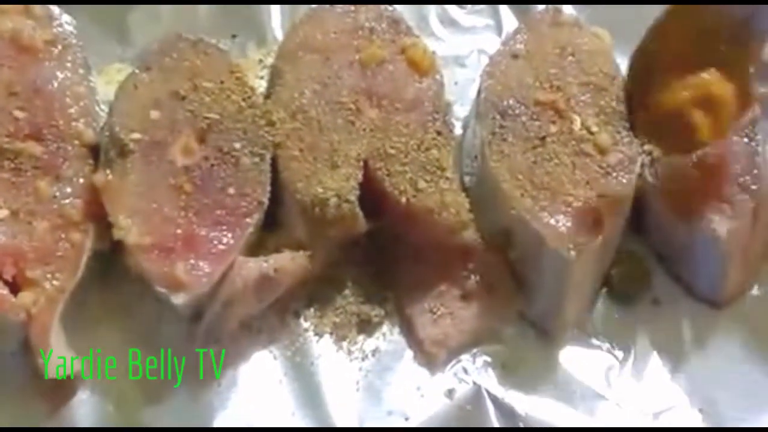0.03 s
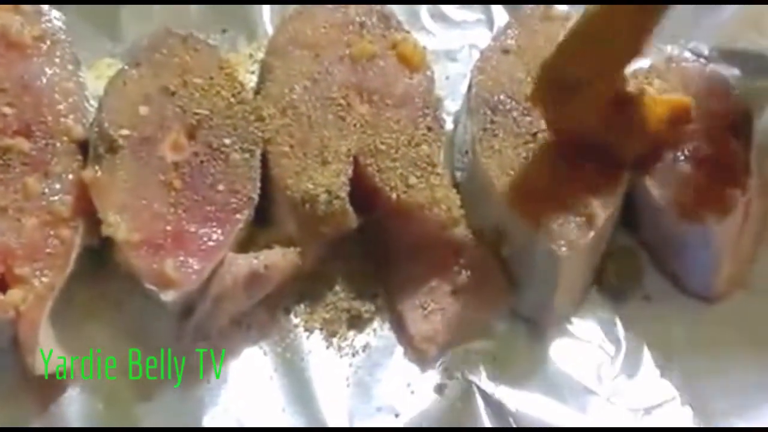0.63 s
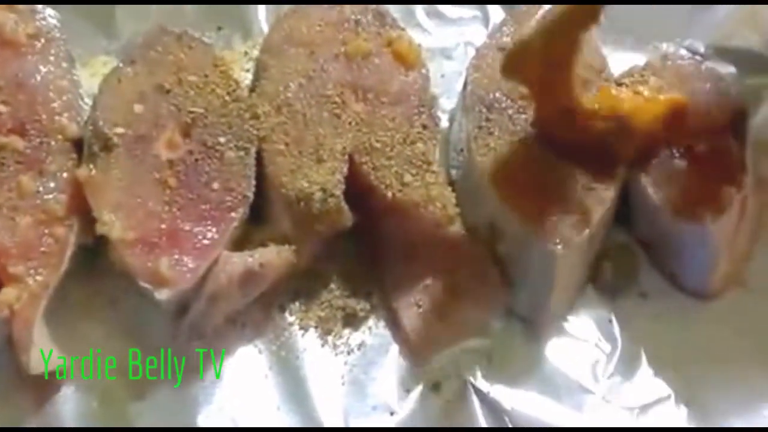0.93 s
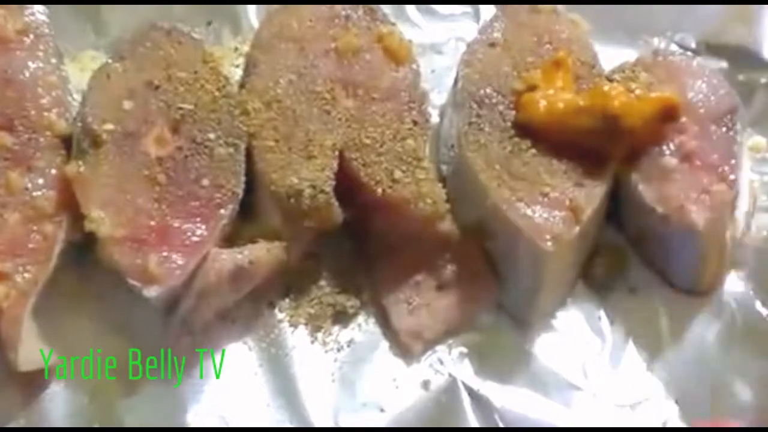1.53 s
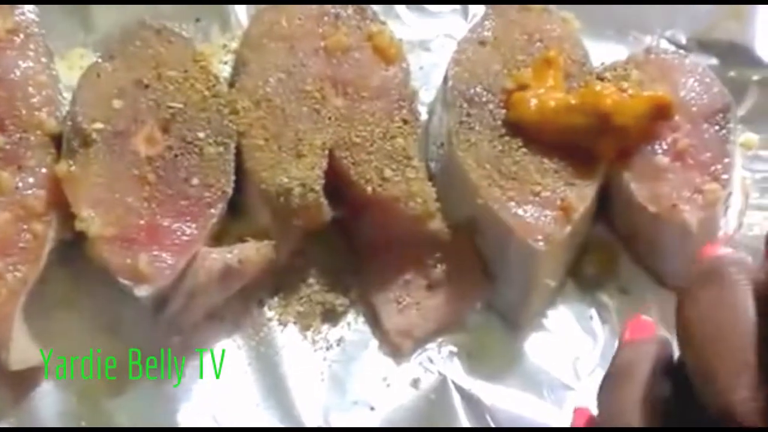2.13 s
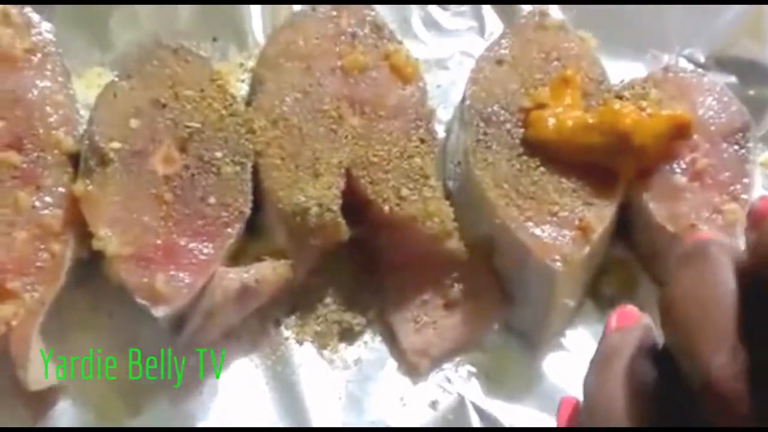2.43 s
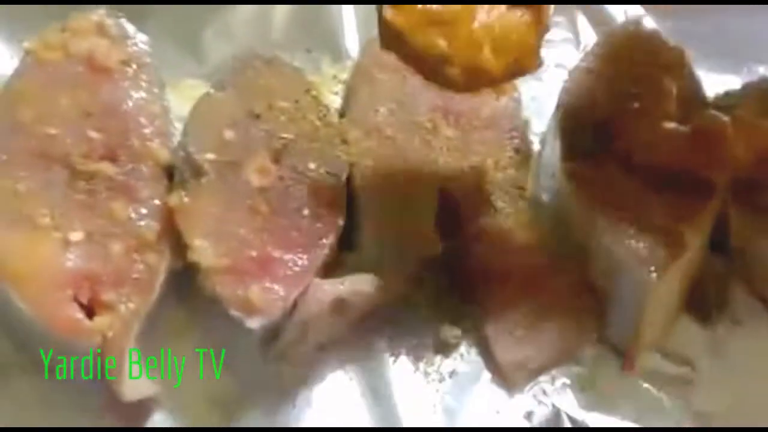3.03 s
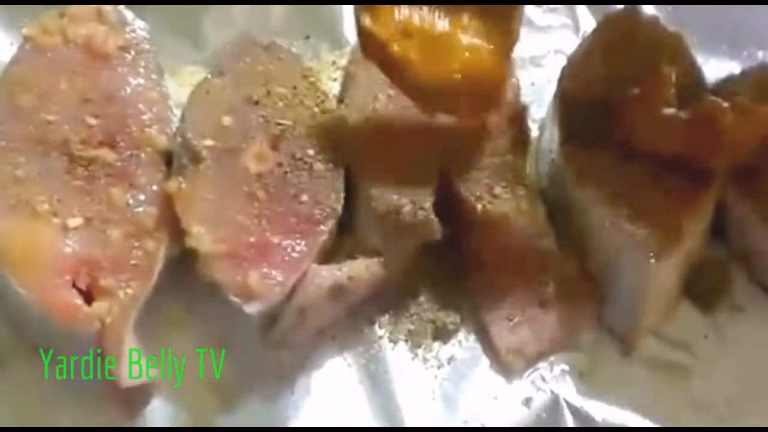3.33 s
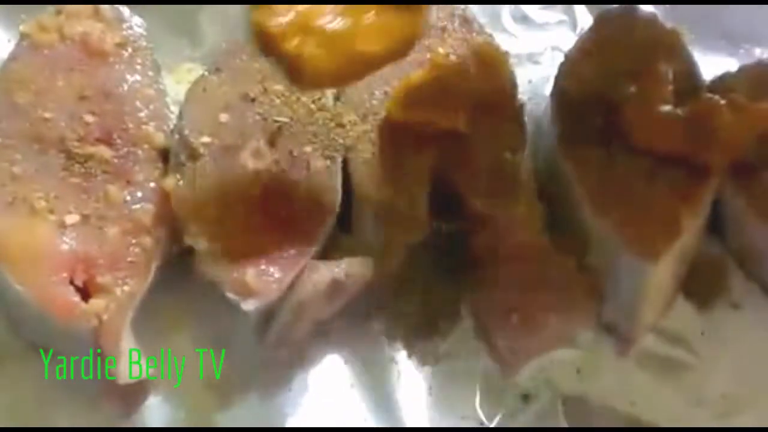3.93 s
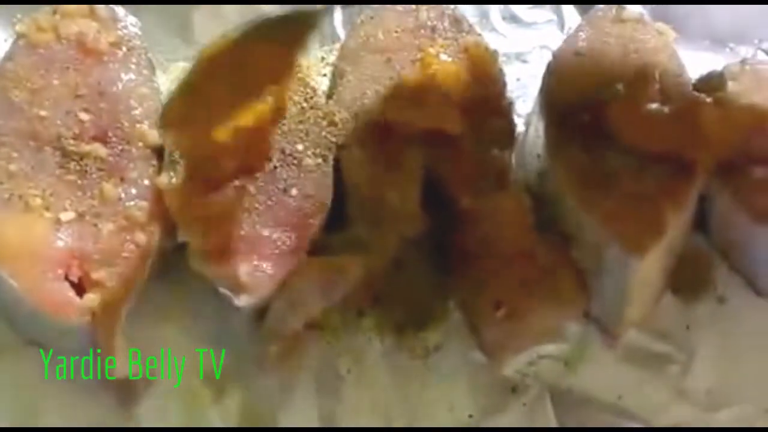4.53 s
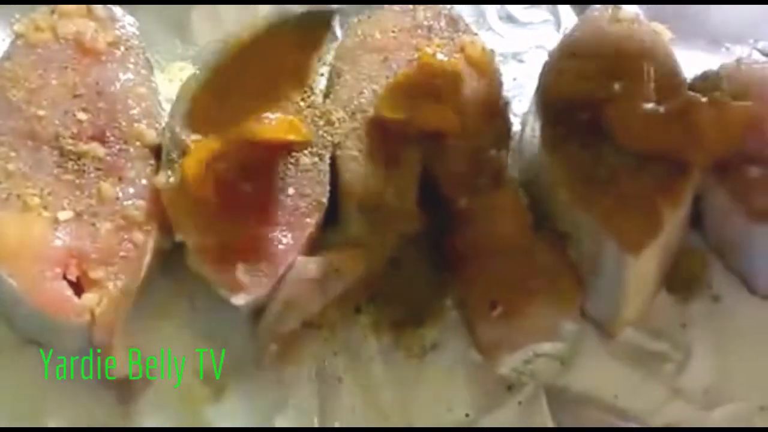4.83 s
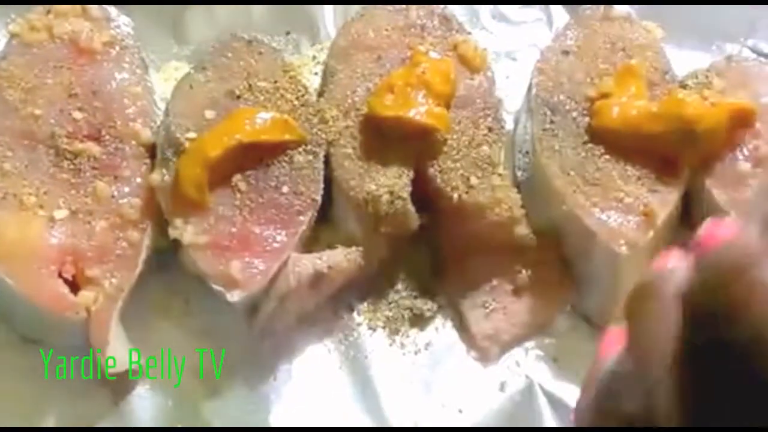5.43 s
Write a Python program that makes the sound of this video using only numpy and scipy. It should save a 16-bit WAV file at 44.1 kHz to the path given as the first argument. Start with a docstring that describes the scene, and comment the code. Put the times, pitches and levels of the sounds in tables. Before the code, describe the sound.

A metal spoon scoops thick sauce from a glass jar twice, close to the microphone and a little to the right. Each scoop follows a short foil rustle and makes an uneven cluster of bright, quickly choked clinks and duller knocks. Between them lies a lull of nearly three seconds with tiny wet ticks and a barely audible whistle. A soft appliance hum and rumble fill the small kitchen throughout.

```python
"""A metal spoon in a glass jar of thick sauce, close to a stereo microphone in a small kitchen.
Room rumble, appliance hum and tiny wet ticks of sauce run throughout. Foil rustles at 1.4 s; from 1.7
to 2.4 s the spoon scoops, each knock ringing the damped glass and the air in the jar. A faint whistle
comes and goes in the pause. Foil rustles again at 4.9 s, and a second scoop knocks from 5.2 s on."""
import sys
import numpy as np
from scipy import signal
from scipy.fft import rfft, irfft
from scipy.io import wavfile

SR = 44100
rng = np.random.default_rng(int(sys.argv[2]) if len(sys.argv) > 2 else 0)


def wrap_up_sound(samples):
    """Save the sound to the file named by the first command line argument, as 16-bit audio."""
    columns = np.atleast_2d(samples).T
    # keep every value between -1 and 1, then stretch to whole-number steps
    tamed = np.clip(columns, -1, 1)
    steps = np.round(tamed * 32767).astype(np.int16)
    wavfile.write(sys.argv[1], SR, steps)


N = 251370
TIME_S = np.arange(N) / SR
AGE_S = TIME_S[:SR // 2]  # time axis of one event


def amp(db):
    """Decibels to gain."""
    return 10 ** (np.asarray(db) / 20)


def unit_rms(x):
    """Scales to rms 1."""
    return x / np.sqrt(np.mean(x ** 2) + 1e-20)


def at_hz(points, hz):
    """Interpolates (Hz, value) rows on a log-frequency axis."""
    f, value = np.transpose(points)
    return np.interp(np.log(hz + 1), np.log(f + 1), value)


def add(mix, start_s, sound):
    """Mixes a stereo sound in."""
    part = mix[:, max(round(start_s * SR), 0):][:, :sound.shape[1]]
    part += sound[:, :part.shape[1]]


def bins_hz(x):
    """Frequencies of the spectrum of x."""
    return np.fft.rfftfreq(x.shape[-1], 1 / SR)


def colour(x, points):
    """Filters by (Hz, dB) rows."""
    return irfft(rfft(x) * amp(at_hz(points, bins_hz(x))), x.shape[-1])


def click(gain_db):
    """Minimum-phase impulse with this spectrum."""
    log_gain = np.log(amp(np.r_[gain_db, gain_db[-2:0:-1]]))
    return np.fft.ifft(np.exp(np.conj(signal.hilbert(log_gain)))).real


def drift(cutoff_hz):
    """Low-passed noise of rms 1."""
    return unit_rms(irfft(rfft(rng.standard_normal(N)) / (1 + (bins_hz(TIME_S) / cutoff_hz) ** 4), N))


def mode(hz, t60_s, build_s=0.001, lag_s=0, choke_s=0.15):
    """One vibration: builds during contact, decays, and is choked as the spoon settles back."""
    swell = (1 - np.exp(-(AGE_S / build_s) ** 2)) * np.exp(-(AGE_S / choke_s) ** 4)
    return swell * np.sin(2 * np.pi * hz * (AGE_S - lag_s)) * amp(-60 * AGE_S / max(t60_s, 0.003))


def kitchen(x, wet_db, correlation, gap_s=0.0046, bend=1):
    """Direct sound plus dense stereo reflections; bend > 1 holds them up briefly before they fall."""
    # Each row: frequency in Hz, room t60 in seconds.
    reverb_times = [(100, 0.63), (900, 0.27), (2600, .21), (5000, .2), (10000, 0.19)]
    common, own = rng.standard_normal((2, len(AGE_S)))
    left = correlation * common + np.sqrt(1 - correlation ** 2) * own
    hz, t, spectra = signal.stft([left, common], SR, nperseg=256)
    fall = amp(-60 * (t / at_hz(reverb_times, hz)[:, None]) ** bend)
    onset = 1 - np.exp(-(AGE_S / gap_s) ** 4)
    tail = signal.istft(spectra * fall, SR)[1][:, :len(AGE_S)] * onset
    wet = signal.fftconvolve(x[None], tail, axes=1)[:, :len(AGE_S)]
    wet -= np.outer(wet @ x / (x @ x), x)  # orthogonal to x, so powers add
    return x + amp(wet_db) * x.std() * np.array([unit_rms(side) for side in wet])


def room_tone(rumble_db=-57.5):
    """Rumble and hiss, a soft rush that grows, and an appliance's wavering hum."""
    # Each row: frequency in Hz, relative level in dB.
    rumble_spectrum = [(15, -53.5), (25, -29), (40, -11.5), (69, -4.5), (129, -2.5), (158, -8), (193, -6),
                       (261, -12.5), (372, -17), (699, -27), (970, -26.5), (1780, -32.5), (3510, -33),
                       (4300, -39), (10400, -35), (13500, -69.5), (22000, -120)]
    rush_spectrum = [(200, -18.5), (500, 0.5), (800, 2.5), (1050, 1.5), (1400, -10.5), (3000, -16.5),
                     (6000, -28.5)]
    # Each row: time in seconds, level in dB.
    rush_levels = [(0, -101), (1.4, -76), (2.6, -69.5), (3.3, -71.5), (5.7, -63.5)]
    # Each row: frequency in Hz, left-right correlation.
    correlations = [(40, 0.99), (250, 0.91), (600, 0.73), (1500, 0.23), (4000, 0.095), (10000, 0.51)]
    # Each row: centre in Hz, width in Hz, level in dB.
    hum_bands = [(74, 14, -67.5), (198.4, 12.2, -63), (239.7, 15, -72)]
    hz = bins_hz(TIME_S)
    common, own, hum_noise = rfft(rng.standard_normal((3, N)))
    correlation = at_hz(correlations, hz)
    air = irfft(np.array([common, correlation * common + np.sqrt(1 - correlation ** 2) * own]), N)
    rumble = amp(rumble_db + 0.5 * drift(cutoff_hz=11)) * unit_rms(colour(air, rumble_spectrum))
    rush_db = np.interp(TIME_S, *np.transpose(rush_levels))
    rush = amp(rush_db) * unit_rms(colour(air[:, ::-1], rush_spectrum))
    hum = sum(amp(db) * unit_rms(irfft(hum_noise / (1 + (2 * (hz - centre_hz) / width_hz) ** 2), N))
              for centre_hz, width_hz, db in hum_bands)
    return rumble + rush + hum


def whistle(hz=3610, wander_hz=14):
    """A faint, slightly unsteady tone that comes and goes."""
    # Each row: start in seconds, length in seconds, peak level in dB.
    swells = [(3.115, 0.1, -78.5), (3.448, .14, -70), (3.58, 0.15, -80.5), (4.199, 0.058, -76)]
    level = sum(amp(db) * np.sin(np.pi * np.clip((TIME_S - start_s) / length_s, 0, 1))
                for start_s, length_s, db in swells)
    return level * np.sin(2 * np.pi * np.cumsum(hz + wander_hz * drift(cutoff_hz=74)) / SR)


def sauce_ticks(db=-66, ticks_per_s=9, decay_s=0.008):
    """Tiny wet ticks as sauce slides off the spoon."""
    starts = rng.random(N) * (rng.random(N) < ticks_per_s / SR)
    level = signal.lfilter([1], [1, -np.exp(-1 / (decay_s * SR))], starts)
    fizz = colour(rng.standard_normal((2, N)), [(1000, -12.5), (5000, -5.5), (8000, 7), (10500, -6)])
    return amp(db) * level * unit_rms(fizz)


def foil_rustle(db, rise_s=0.006, decay_s=0.0069, snaps_per_s=14000):
    """A swell of tiny snaps in kitchen foil."""
    # Each row: frequency in Hz, relative level in dB.
    snap_spectrum = [(30, -36.5), (120, -7), (500, -25.5), (1000, -18), (2000, -17), (3000, -5.5),
                     (3900, -2.5), (5600, -2), (7000, -9.5), (9000, -17.5), (10600, -20)]
    snaps = rng.standard_normal(len(AGE_S)) * (rng.random(len(AGE_S)) < snaps_per_s / SR)
    snap = click(at_hz(snap_spectrum, bins_hz(AGE_S)))
    crackle = unit_rms(signal.fftconvolve(snaps, snap)[:len(AGE_S)])
    swell = np.minimum(AGE_S / rise_s, 1) * np.exp(-np.maximum(AGE_S - rise_s, 0) / decay_s)
    return kitchen(amp(db) * crackle * swell, wet_db=1, correlation=0.4, bend=0.9)


def handling_thud(db, hz):
    """Handling excites one soft, low mode."""
    return kitchen(amp(db) * mode(hz, t60_s=0.17), wet_db=-0.5, correlation=1)


def jar_bump(db):
    """The whole jar gives a short, dull knock."""
    # Each row: frequency in Hz, relative level in dB, t60 in seconds.
    body_modes = [(334, -10, .041), (608, -1, 0.038), (1210, 4.5, 0.0085)]
    body = sum(amp(db + mode_db) * mode(hz, t60_s) for hz, mode_db, t60_s in body_modes)
    return kitchen(body, wet_db=-3.5, correlation=0.9)


def air_plop(db, hz):
    """The air above the sauce rings hollow, at a pitch set by the spoon's depth."""
    return kitchen(amp(db) * mode(hz, t60_s=0.069, build_s=0.0029), wet_db=-8.5, correlation=0.98)


def contact_db(hz, hardness_hz):
    """Low-pass gain of a blow: a soft contact leaves out the treble."""
    return -10 * np.log10(1 + (hz / hardness_hz) ** 8)


def spoon_clack(db, hz, hardness_hz, chatter_s=0.0035):
    """The spoon lands, chatters and rings briefly; its pitch depends on which part lands."""
    # Each row: frequency in Hz, relative level in dB.
    clack_spectrum = [(100, -26), (400, -22.5), (1000, -15), (1500, -21.5), (2200, -19.5), (2600, -8),
                      (3000, -9.5), (3450, 0.5), (4300, -1.5), (5000, 0.5), (6000, -4.5), (7400, -8.5),
                      (8200, -9.5), (10600, -16.5)]
    chatter = rng.standard_normal(len(AGE_S)) * np.exp(-AGE_S / chatter_s)
    snap = click(at_hz(clack_spectrum, bins_hz(AGE_S)) + contact_db(bins_hz(AGE_S), hardness_hz))
    clack = amp(db - 3) * signal.fftconvolve(chatter, snap)[:len(AGE_S)]
    return clack + amp(db - 4) * mode(hz, t60_s=0.015)


def spoon_knock(start_s, ring_db, clack_db, spoon_hz, hardness_hz, damping):
    """One blow rings spoon, glass and air; a spoon left pressed damps the glass and raises its modes."""
    # Each row: free frequency in Hz, relative level in dB, undamped t60 in seconds.
    glass_modes = [(2591.5, -8.5, 0.076), (2783, -29, 0.02), (3280, -18, 0.077), (3580, -18, 0.076),
                   (4200, -20.5, 0.05), (4545, -11.5, 0.06), (4826, -6, 0.047), (4890, -7, .14),
                   (4920, -4.5, 0.13), (5160, -7, 0.046), (5080, -15, .04), (5540, -11.5, 0.045),
                   (6230, -22, 0.037), (6846, -16, 0.035), (8060, -20, .02)]  # rim mode first; the pair near 4.9 kHz beats
    # Each row: time in seconds, stiffness of the leaning spoon's contact in Hz.
    lean = [(1.68, 960), (1.75, 100), (2.05, 101), (2.3, 1653), (2.37, 1395), (2.42, 294), (5.19, 198),
            (5.69, 690)]
    # Each row: time in seconds, base reflection level of an undamped blow in dB.
    room_levels = [(1.68, 4), (2.05, 5.5), (2.37, 8.5), (2.42, -4), (5.19, 3), (5.65, 7.5)]  # driest while the jar is held close
    stiffness_hz = np.interp(start_s, *np.transpose(lean))
    room_db = np.interp(start_s, *np.transpose(room_levels)) - 10 * np.log2(damping)  # damped is drier
    rim_db = min(-10 - 0.8647 * ring_db - 3.5 * np.log2(hardness_hz / 5900), 4)  # favours light, soft taps
    lag_s = rng.uniform(0.00038, 0.0016)  # the bending wave runs round the wall
    rim, *wall = [amp(ring_db + db + contact_db(hz, hardness_hz))
                  * mode(np.hypot(hz, stiffness_hz), t60_s / damping, lag_s=lag_s)
                  for hz, db, t60_s in glass_modes]
    clack = spoon_clack(clack_db, spoon_hz, hardness_hz)
    bend = 1 + 0.35 / damping
    return (kitchen(clack, wet_db=room_db + 4, correlation=0.6, bend=1.1)
            + kitchen(amp(rim_db) * rim, wet_db=room_db + 3, correlation=0.19, bend=bend)
            + kitchen(sum(wall), wet_db=room_db - 1.5, correlation=0.65, bend=bend)
            + air_plop(ring_db - 32, hz=972))


def scoops():
    """Two scoops, each led by foil; the right microphone port faces them."""
    # Each row: start in seconds, glass ring in dB, clack in dB, spoon pitch in Hz,
    # contact hardness in Hz, damping factor.
    knocks = [ (1.6855, -15, -6.5, 2960, 6934, 2.4), (1.748, -6, -6.5, 4944, 10700, 1.02),
              (2.0098, -6, -5, 6210, 7950, 1.72), (2.0500, -18, -18, 4000, 8700, 1.33),
              (2.1147, -8, -1, 3970, 6500, 2.76), (2.299, -47, -43.5, 3130, 4640, 1.2),
              (2.3180, -37, -28.5, 5250, 5640, 2.8), (2.3673, -26.5, -17.5, 3360, 6070, 2.36),
              (2.3905, -39, -43, 3290, 5060, 3), (2.4200, -17.5, -33, 2750, 4800, 1.5),
              (2.4322, -17, -42.5, 5230, 5330, 2.1), (2.4421, -10.5, -11.5, 4730, 5220, 2.14),
              (5.188, -14.5, -8.5, 4700, 12000, 1.65), (5.4892, -29, -17.5, 5080, 5600, 1.98),
              (5.5024, -28, -31.5, 3480, 5000, 2.4), (5.6207, -7.5, -3, 2750, 4950, 1.94),
              (5.6430, -19.5, -40, 2730, 4400, 1.17), (5.6647, -13, -8, 3440, 4760, 1.86),
              (5.675, -18.5, -21, 3580, 4450, 3.1), (5.6802, -12, -10, 3620, 4700, 2.2)]
    # Each row: start in seconds, level in dB, pitch in Hz.
    plops = [(1.6853, -24, 955), (1.702, -29, 1067), (2.0094, -28.5, 963), (2.045, -33, 925),
             (2.1146, -33, 891), (2.127, -22.5, 893), (2.4432, -37, 873), (5.1876, -27.5, 748)]
    thuds = [(1.545, -41, 192), (2.016, -48, 83.5), (2.37, -43.5, 134), (2.426, -42.5, 76),
             (5.189, -45, 196.6)]
    # Each row: start in seconds, level in dB.
    bumps = [(1.748, -52.5), (5.189, -25.5), (5.623, -39.5)]
    rustles = [(1.425, -38), (1.438, -35.5), (1.475, -28), (1.532, -31), (1.542, -22), (4.914, -50.5),
               (4.933, -32), (4.954, -22), (4.981, -39)]
    # Each row: frequency in Hz, gain of the left port against the right in dB.
    left_port = [(2000, 1), (2600, -6.5), (3300, -8), (4200, -11.5), (5000, -8), (6500, -9), (8000, 2),
                 (10500, -5)]
    mix = np.zeros((2, N))
    for start_s, *blow in knocks:
        add(mix, start_s, spoon_knock(start_s, *blow))
    for start_s, db, hz in plops:
        add(mix, start_s, air_plop(db, hz))
    for start_s, db in bumps:
        add(mix, start_s, jar_bump(db))
    for start_s, db, hz in thuds:
        add(mix, start_s, handling_thud(db, hz))
    for start_s, db in rustles:
        add(mix, start_s, foil_rustle(db))
    return np.array([colour(mix[0], left_port), mix[1]])


def scene():
    """All sources at the two microphone ports."""
    return scoops() + sauce_ticks() + whistle() + room_tone()


def record(dry):
    """Soft clipping, then a low-pass."""
    cutoff_hz = 10650
    lowpass = signal.firwin(401, cutoff_hz, window=("kaiser", 8), fs=SR)
    return signal.oaconvolve(np.tanh(dry), lowpass[None], "same")


dry = scene()
out = record(dry)
wrap_up_sound(out)
```